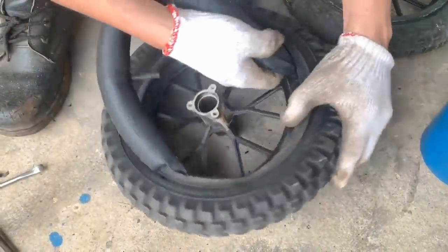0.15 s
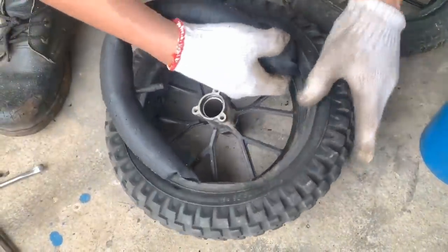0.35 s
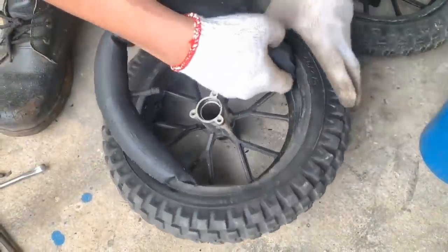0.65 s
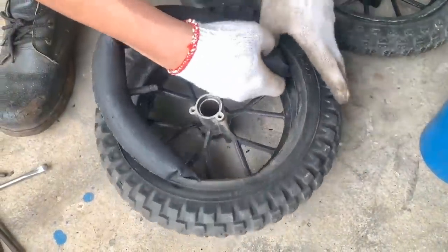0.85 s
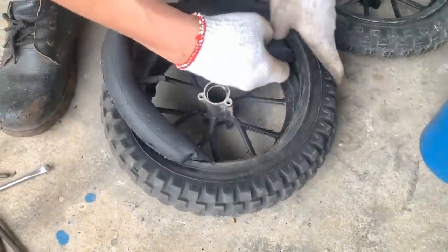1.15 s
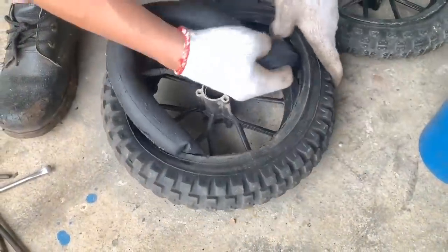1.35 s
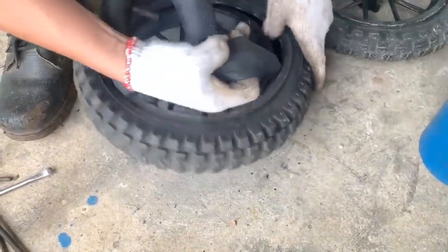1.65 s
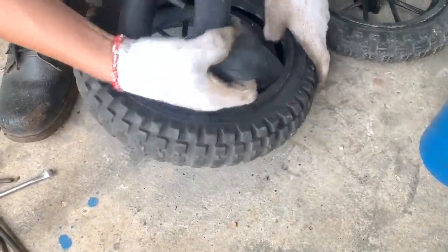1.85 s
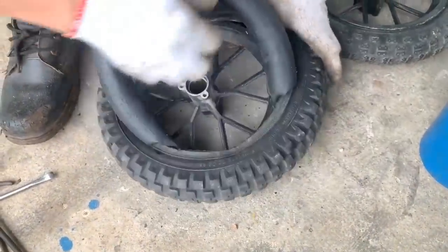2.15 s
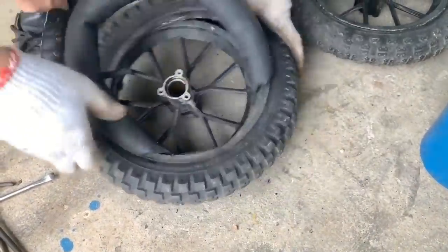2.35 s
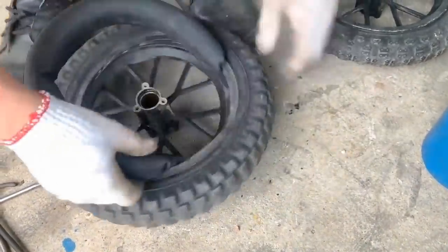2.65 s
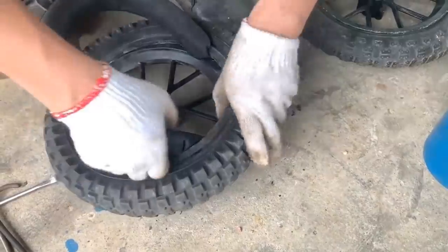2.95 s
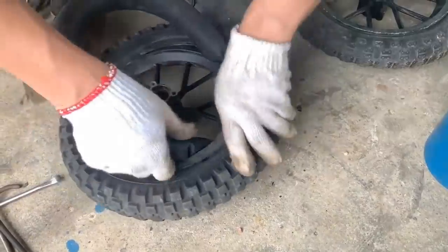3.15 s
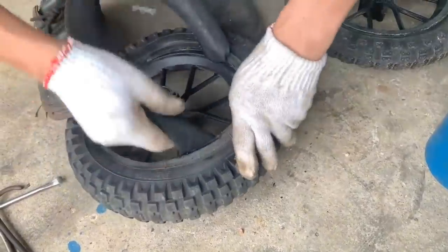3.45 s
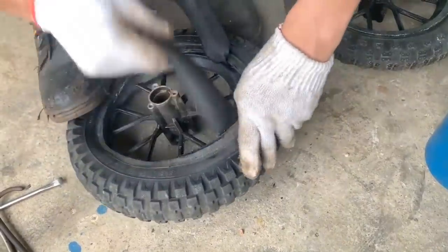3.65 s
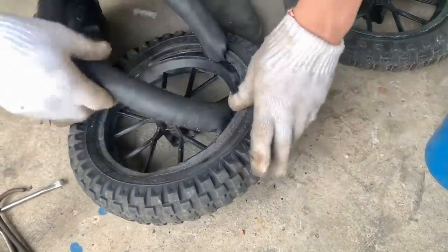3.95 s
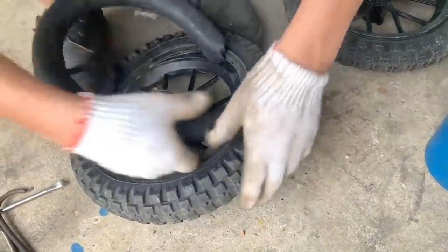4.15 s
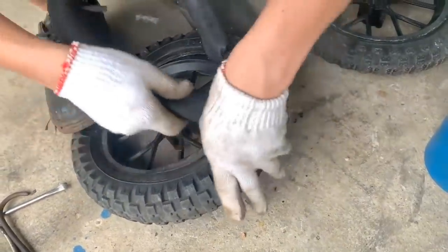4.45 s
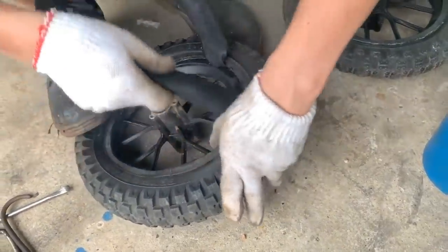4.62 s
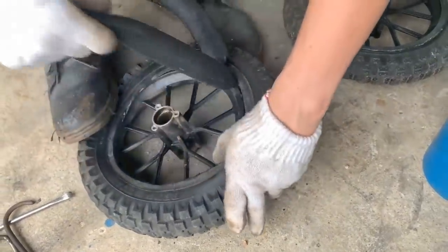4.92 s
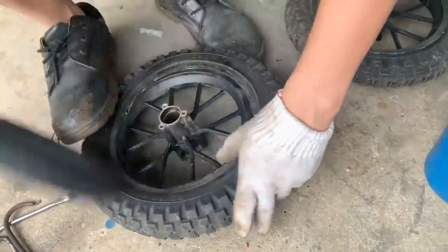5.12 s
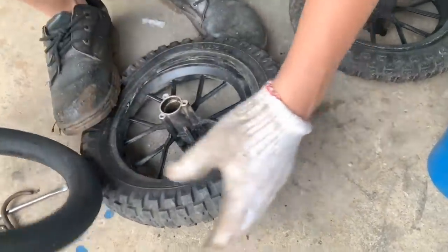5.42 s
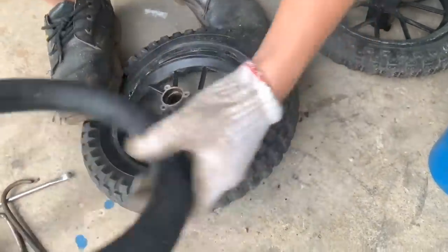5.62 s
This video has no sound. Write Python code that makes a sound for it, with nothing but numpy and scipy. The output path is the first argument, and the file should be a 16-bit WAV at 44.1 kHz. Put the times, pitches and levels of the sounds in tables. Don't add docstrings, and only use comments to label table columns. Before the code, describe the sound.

Close stereo pickup in an open workshop with faint low traffic. Gloved hands make a small tyre creak and rustle while its alloy wheel drags, ticks and bumps on concrete. Around two seconds it knocks hard and rings briefly, then again with a chirp. Rubber rubs and dull taps follow, until the inner tube pops out with a hollow thump and a small puff of air.

```python
import sys
import numpy as np
from scipy import signal
from scipy.fft import rfft, irfft, next_fast_len
from scipy.io import wavfile
from scipy.ndimage import uniform_filter1d

SR = 44100
rng = np.random.default_rng(int(sys.argv[2]) if len(sys.argv) > 2 else 0)


def output_pcm(signal):
    pcm = np.clip(np.atleast_2d(signal).T, -1, 1) * 32767
    wavfile.write(sys.argv[1], SR, np.round(pcm).astype(np.int16))


def nominal_scale(level):
    x = np.asarray(level, float) / 20
    return 10 ** x


N = 254898
SIZE = next_fast_len(N)


def evened(x):
    return x / np.sqrt(np.mean(x ** 2) + 1e-20)


def read(points, hz):
    f, value = np.transpose(points)
    return np.interp(np.log(hz + 1), np.log(f + 1), value)


def curve(rows):
    rows = np.asarray(rows)
    return np.interp(np.arange(N) / SR, rows[:, 0], rows[:, 1])


def add(mix, s, sound):
    part = mix[..., max(round(s * SR), 0):][..., :sound.shape[-1]]
    part += sound[..., :part.shape[-1]]


def colour(x, points):
    gain_db = np.maximum(read(points, abs(np.fft.fftfreq(4096, 1 / SR))), -100)
    taps = np.fft.ifft(np.exp(np.conj(signal.hilbert(np.log(nominal_scale(gain_db)))))).real[:2048]
    return signal.oaconvolve(np.atleast_2d(x), taps[None])[:, :x.shape[-1]]


def ring(hz, db, t60, length):
    t = np.arange(round(length * SR)) / SR
    return nominal_scale(db - 60 * t / t60) * np.sin(2 * np.pi * hz * t)


def grit(per_s, spread_db, clump_db, clump_s):
    size = nominal_scale(spread_db * np.minimum(rng.exponential(1, N), 4)) * rng.choice([-1, 1], N)
    clumps = evened(uniform_filter1d(rng.standard_normal(N), round(clump_s * SR)))
    clicks = rng.random(N) < per_s / SR
    return evened(size * clicks * nominal_scale(clump_db * clumps))


# f/Hz, likeness [0-1]
LIKENESS = [(60, 0.88), (230, 0.92), (910, 0.18), (3560, 0.18), (13900, 0.15)]


def pair(a, b):
    same = np.clip(read(LIKENESS, np.fft.rfftfreq(SIZE, 1 / SR)), 0, 1)
    second = irfft(same * rfft(a, SIZE) + np.sqrt(1 - same ** 2) * rfft(b, SIZE), SIZE)[:N]
    return np.array([a, second])


# f/Hz, level/dB per Hz
STREET = [(18, -40.5), (40, -20), (70, 2), (95, 4), (165, -5), (306, -15.5), (859, -29), (1960, -33.5),
          (6600, -46.5), (8320, -39.5), (9470, -51.5), (10800, -35.5), (12600, -48), (14300, -64)]
# t/s, level/dB
RUMBLE = [
    (0.0, -52),
    (2.8, -53.5),
    (3.05, -56),
    (3.8, -48),
    (4.0, -52.5),
    (5.78, -55.5),
]


def far():
    frames, hz = N // 256 + 5, np.fft.rfftfreq(1024, 1 / SR)
    a, b, c, d, patches = rng.standard_normal((frames, 513, 5)).T
    patches = uniform_filter1d(patches, size=10, axis=0)
    patches = evened(uniform_filter1d(patches, size=10, axis=1))
    z = np.array([a + 1j * b, c + 1j * d]) * nominal_scale(read(STREET, hz)[:, None] + 1.2 * patches)
    bed = evened(pair(*signal.istft(z, nperseg=1024, noverlap=768)[1][:, :N]))
    bed = signal.sosfilt(signal.butter(4, 48, "high", fs=SR, output="sos"), bed)
    low = signal.sosfilt(signal.butter(2, 200, fs=SR, output="sos"), bed)
    return nominal_scale(curve(RUMBLE) - 0.07) * low + nominal_scale(-55) * (bed - low)


# t/s (middle), half length/s, squeeze level/dB, glove slide level/dB
HEAVES = [(.14, 0.1, -49.5, -60.5), (0.443, 0.13, -50, -62.5), (0.691, 0.083, -47.5, -60.5),
          (0.96, 0.093, -55.5, -67), (1.29, 0.099, -60.5, -64), (1.51, 0.1, -54.5, -68.5),
          (1.736, .12, -77, -65.5), (2.08, 0.23, -57, -66.5), (2.388, 0.034, -54.5, -50.5),
          (2.447, 0.092, -54, -53.5), (2.566, 0.094, -54, -58.5), (3.024, .12, -59, -67),
          (3.168, 0.2, -55, -76), (3.54, 0.16, -56, -61.5), (3.669, 0.12, -48.5, -67),
          (3.816, 0.11, -59, -66), (4.253, 0.36, -63, -73), (4.629, 0.077, -51.5, -86),
          (4.817, 0.3, -58, -66), (4.969, 0.049, -65, -48), (5.127, .12, -58.5, -77),
          (5.453, 0.1, -70.5, -86.5)]
HEAVE_FALL_DB = -12
SQUEEZE = dict(order=2, rest_db=-73.5)
SLIDE = dict(order=3, rest_db=-81.5)


def hands(order, rest_db):
    t, rows = np.arange(0, N / SR + .01, .005), np.array(HEAVES)
    away = abs(t[:, None] - rows[:, 0]) / rows[:, 1]
    power = (nominal_scale(rows[:, order] + HEAVE_FALL_DB * away) ** 2).sum(1) + nominal_scale(rest_db) ** 2
    return curve(np.transpose([t, 10 * np.log10(power)]))


# f/Hz, level/dB
FLEX = [(120, -18), (220, 6), (380, 2.5), (600, -1), (1000, -11.5), (2000, -30)]
# f/Hz, level/dB
HISS = [(2000, -29.5), (3500, -3.5), (5500, -0.5), (6700, -8.5), (8400, -4), (10000, 3.5), (13000, -5.5)]


def tyre():
    flex = pair(grit(1200, 3, 3, .02), grit(1200, 3, 3, .02))
    hiss = pair(grit(9000, 3, 2.5, .02), grit(9000, 3, 2.5, .02))
    creak = nominal_scale(hands(**SQUEEZE) - 4) * evened(colour(flex, FLEX))
    return creak + nominal_scale(hands(**SLIDE) - 2.5) * evened(colour(hiss, HISS))


# f/Hz, level/dB struck at rim, level/dB struck at hub, level/dB
# dragged flat, level/dB dragged on edge, t60/s
WHEEL = [(405.3, -21, -25.5, -15, 5, 0.03), (520, -14, -24, -20, 0, .03), (600, -9, -19, -17, -11.5, 0.078),
         (748, -10, -36, -2.5, -29, 0.1), (1083, -26, -23, -17.5, -15.5, 0.069),
         (1210.4, -9, 0, -8, -17, 0.052), (1255, -7, -2.5, -8, 2.5, .05),
         (1620, -5.5, -21, -22.5, -21, 0.052), (1815, -3.5, -5.5, -17, -18, 0.28),
         (1917, -14, -1, -13, -2.5, 0.04), (2102, -16, -16, -25, -20, .05), (2502, -13, -26, -30, -35, .05),
         (2920, 5, -16, -10, -28.5, 0.05), (4440, -14, -21, -18, -29.5, 0.083),
          (4506, -7, -17.5, -22, -41, 0.066), (4823, -17, -12, -25.5, -17.5, 0.06),
          (4900, -23, -22, -31, -20, 0.09), (5450, -32, -12, -24, -36, 0.19),
          (6250, -26, -21, -32, -42.5, 0.078), (7520, -29.5, -28.5, -34, -42.5, 0.1),
          (7994, -29, -19, -25.5, -21, 0.12), (8500, -32.5, -27.5, -28, -37, 0.075),
          (10620, -15, -30, -27.5, -27, 0.05), (11698, -31.5, -22.5, -23, -34.5, 0.15),
          (12900, -25, -41, -37, -42.5, .05), (13400, -36, -23.5, -35, -42.5, 0.091),
         (3445, -24, -28, -35, -45, .08), (3806, -28, -30, -38, -45, .08), (4070, -26, -30, -35, -45, .08),
        (4371, -14, -22, -25, -35, .1), (5023, -12, -24, -32, -40, .045), (5755, -30, -18, -34, -45, .09),
        (6412, -32, -20, -34, -45, .09), (6900, -30, -28, -36, -45, .15), (7908, -24, -27, -32, -40, .11)]


def wheel(low, high, order, damping, length):
    t, modes = np.arange(round(length * SR)) / SR, 0
    for m in WHEEL:
        share = low if m[0] < 2500 else high
        db = m[order] + share * (m[order + 1] - m[order])
        modes = modes + ring(m[0], db, damping * m[-1], length)
    return modes * (1 - np.exp(-t / 0.00048))


# f/Hz, level/dB
RUB = [(500, -20), (1000, -3), (1700, -4), (2500, -8.5), (3500, -16.5), (5000, -35.5)]
SCRAPE_FROM_SQUEEZE, SCRAPE_DB = .6, -4.5
METAL_SHARE, STILL_S = .33, 3.3


def scrape():
    metal = wheel(.2, .2, order=3, damping=1, length=.2)
    metal = evened(signal.oaconvolve(grit(1300, 1.6, 2, .012), metal)[:N])
    rubber = evened(colour(pair(grit(4000, 3, 3, .02), grit(4000, 3, 3, .02)), RUB))
    share = METAL_SHARE * np.where(np.arange(N) < STILL_S * SR, 1, .1)
    level_db = SCRAPE_FROM_SQUEEZE * hands(**SQUEEZE) + (1 - SCRAPE_FROM_SQUEEZE) * hands(**SLIDE)
    return nominal_scale(level_db + SCRAPE_DB) * (np.sqrt(share) * metal + np.sqrt(1 - share) * rubber)


def patchy(x, depth_db):
    z = signal.stft(x, nperseg=512)[2]
    field = uniform_filter1d(rng.standard_normal(z.shape[1:]), size=7, axis=0)
    field = evened(uniform_filter1d(field, size=9, axis=1))
    return signal.istft(z * nominal_scale(depth_db * field), nperseg=512)[1][:, :N]


# start t/s, end t/s, start level/dB, end level/dB, tipped on edge [0-1]
DRAGS = [(0, .09, -64.5, -68, 0.4), (0.088, 0.178, -49.5, -46, 0), (.254, 0.323, -56.5, -62.5, 0.16),
         (0.404, 0.427, -55, -47, .7), (0.634, 0.723, -57, -55.5, 0.38), (.793, 0.903, -61.5, -74, 0.7),
         (0.921, 0.942, -50.5, -52.5, 0.9), (0.965, 1.022, -52, -49, 1), (1.028, 1.055, -53, -60, 1),
         (1.28, 1.284, -63, -61, 0.7), (1.345, 1.362, -41.5, -75, 1), (1.414, 1.503, -48, -49, 1),
         (1.496, 1.566, -72, -65.5, 0.4), (1.73, 1.804, -71.5, -68, 0.4), (1.997, 2.014, -52, -30, .1),
         (2.085, 2.167, -54, -58, 0.25), (2.155, 2.377, -62, -66, 0.25), (2.355, 2.386, -56, -35, .5),
         (2.382, 2.523, -44.5, -75, 0.6), (2.573, 2.662, -59, -53, 1), (2.982, 3.115, -64, -59.5, 0.5)]
EDGE_POWER = 1.8


def drags():
    out, slips = np.zeros(N), grit(2500, 2.5, 2.6, .007)
    for start, end, start_db, end_db, edge in DRAGS:
        stroke = slips[round(start * SR):round(end * SR)]
        stroke = stroke * nominal_scale(np.linspace(start_db, end_db, len(stroke)))
        stroke = stroke * signal.windows.tukey(len(stroke), .25)
        body = wheel(edge, edge ** EDGE_POWER, order=3, damping=.45, length=.15)
        add(out, start, signal.fftconvolve(stroke, body / np.linalg.norm(body)))
    return out


def tap(db, hz, treble_db, t60):
    hold_s, lean_db = .0045, -2.5
    t = np.arange(round(.06 * SR)) / SR
    swell = nominal_scale(-60 * np.maximum(t - hold_s, 0) / t60) * np.minimum(t / .002, 1)
    noise = rng.standard_normal((2, len(t))) * swell
    knock = signal.fftconvolve(noise[0], ring(hz, 0, 8.6 / hz, .033))[:len(t)]
    tick = colour(noise[1], HISS)[0]
    sound = knock / abs(knock).max() + nominal_scale(treble_db) * tick / abs(tick).max()
    return nominal_scale(db + np.array([[.5], [-.5]]) * lean_db) * sound


# t/s, peak level/dB, centre f/Hz, treble level/dB
TAPS = [(0.098, -52, 783, -2), (0.137, -46, 756, -15), (0.264, -53, 848, -10), (0.326, -57, 248, 1.5),
        (0.374, -54, 1300, -10), (0.635, -54, 1890, -10), (0.904, -47.5, 295, -7.5), (1.864, -60, 250, -23),
        (1.891, -52.5, 565, -31), (2.229, -54, 640, -3), (2.57, -51.5, 1800, 2), (2.763, -57, 307, 4),
        (3.089, -45, 432, -26), (3.151, -47, 477, -9.5), (3.23, -46.5, 473, -25), (3.26, -44, 520, -23),
        (3.335, -55, 930, -14), (3.471, -54, 1080, -15), (3.54, -52, 1010, -15), (3.815, -48, 720, -23),
        (5.144, -50, 374, -10), (5.674, -61, 387, -3.5)]


def taps():
    out = np.zeros((2, N))
    for s, *row in TAPS:
        add(out, s, tap(*row, t60=.032))
    return out


# t/s, metal level/dB, knock f/Hz, knock level/dB, ring stops after/s
BUMPS = [(0.4165, -46, 600, -48, .01), (0.442, -33, 850, -32, .009), (0.6414, -53, 1240, -55, .01),
         (0.6729, -46, 1300, -52, .01), (0.7277, -39, 1170, -38, .008), (0.9238, -45, 1320, -50, .012),
         (0.9632, -44, 380, -47, .01), (1.0321, -42, 400, -47, .01), (1.4165, -50, 600, -48, .008),
         (1.4391, -36, 1280, -42, .012), (1.459, -46, 520, -42, .008), (1.4897, -36, 520, -35, .004),
         (1.8642, -62, 735, -57, .006), (2.0112, -20, 1200, -18, .004), (2.0782, -20, 1500, -20, .003),
         (2.391, -30, 1250, -22, .005), (2.2295, -56, 700, -58, .008), (4.3015, -60, 870, -36, .003),
         (4.305, -70, 400, -39, .003)]
BUMP_CONTACT_S, KNOCK_CYCLES = .00035, 7


def bumps():
    out, t = np.zeros(N), np.arange(round(.06 * SR)) / SR
    metal = wheel(1, 1, order=1, damping=.6, length=.06)
    metal = signal.fftconvolve(metal, np.hanning(round(BUMP_CONTACT_S * SR)))[:len(t)]
    for s, metal_db, hz, knock_db, stop_s in BUMPS:
        stilled = nominal_scale(metal_db - 1500 * np.maximum(t - stop_s, 0)) * metal / abs(metal).max()
        add(out, s, stilled + ring(hz, knock_db, KNOCK_CYCLES / hz, .06))
    return out


# start t/s, loudest t/s, end t/s, level/dB, f/Hz
SING = [
    (.812, .83, .905, -61, 1815),
    (1.492, 1.515, 1.57, -62, 1812),
    (2.384, 2.39, 2.4, -21, 1830),
    (2.384, 2.389, 2.399, -29, 4823),
    (2.45, 2.46, 2.5, -52, 1808),
    (2.567, 2.63, 2.66, -49.5, 1808),
    (2.638, 2.662, 2.697, -38, 1808),
]
SING_RISE_DB, SING_STOP_DB = -5, -7


def sing():
    out = np.zeros(N)
    for start, top, end, db, hz in SING:
        t = np.arange(start, end, 1 / SR)
        swell = nominal_scale(db + np.interp(t, [start, top, end], [SING_RISE_DB, 0, SING_STOP_DB]))
        add(out, start, swell * np.sin(2 * np.pi * hz * t) * signal.windows.tukey(len(t), .35))
    return out


# t/s, peak level/dB, centre f/Hz, treble level/dB
RAPS = [
    (1.337, -49, 1360, -3.5),
    (2.986, -52, 760, -13),
    (3.655, -39, 1120, -10),
    (3.664, -36, 960, -10),
    (3.774, -44, 1300, -8),
]


def raps():
    out = np.zeros((2, N))
    for s, *row in RAPS:
        add(out, s, tap(*row, t60=.019))
    return out


# t/s, peak level/dB, hub share [0-1], hand stops the ring after/s, rattle level/dB
CLANGS = [
    (2.011, -15.5, .02, .066, 2.5),
    (2.0775, -22.5, .1, .009, 0),
    (2.103, -40, .5, .05, -20),
    (2.3845, -18, .98, .04, -5),
    (2.4303, -34, .98, .02, -15),
    (2.478, -48, .9, .01, 6),
]
BLOW_S = .011
FIRST_BLOW, FIRST_BLOW_S = .6, .0015


def clang(db, hub, stop_s, rattle_db):
    t = np.arange(round(.2 * SR)) / SR
    struck = wheel(hub, hub, order=1, damping=1, length=.2) * (1 - .8 * np.exp(-t / .005))
    chatter = rng.standard_normal(len(t)) * (1 + FIRST_BLOW * np.exp(-t / FIRST_BLOW_S))
    chatter = chatter * nominal_scale(-500 * t - 4600 * np.maximum(t - BLOW_S, 0))
    rattle = signal.fftconvolve(chatter, wheel(hub, hub, order=1, damping=.16, length=.055))[:len(t)]
    crack = colour(chatter, [(200, -5.5), (700, 2.5), (3000, -8), (6000, -2.5), (13000, -13)])[0]
    rattle = rattle / abs(rattle).max() + nominal_scale(-4) * crack / abs(crack).max()
    ringing = nominal_scale(-3000 * np.maximum(t - stop_s, 0)) * struck / abs(struck).max()
    return nominal_scale(db) * (ringing + nominal_scale(rattle_db) * rattle)


def clangs():
    out = np.zeros(N)
    for s, *row in CLANGS:
        add(out, s, clang(*row))
    return out


# loudest t/s, length/s, level/dB, centre f/Hz, treble level/dB
RUBS = [(2.998, 0.067, -53, 256, -39), (3.084, 0.068, -54, 450, -20.5), (3.281, 0.086, -55.5, 504, -14),
        (3.564, 0.09, -46.5, 1002, -7), (3.667, 0.067, -45, 900, -4.5), (3.778, 0.042, -53, 714, 1.5),
        (4.286, 0.05, -58, 1950, -8), (3.565, .06, -50, 400, -30), (3.59, .1, -54, 1700, -20),
        (3.5, .12, -56, 1050, -30), (3.62, .07, -55, 1050, -30), (4.626, 0.08, -56.5, 600, -7),
        (4.866, 0.076, -52.5, 400, -8), (4.992, 0.072, -43.5, 1580, -18), (5.148, 0.032, -54, 530, -2),
        (2.629, 0.06, -50.5, 400, -26), (5.695, 0.61, -75, 2990, -22), (4.083, 0.1, -70.5, 2000, 7)]
RUB_RISE = .44


def rubs():
    out = np.zeros((2, N))
    slips = pair(grit(5000, 2.5, 2.5, .008), grit(5000, 2.5, 2.5, .008))
    for top, length, db, hz, treble_db in RUBS:
        start, end = top - RUB_RISE * length, top + (1 - RUB_RISE) * length
        stroke = slips[:, round(start * SR):round(end * SR)]
        t = start + np.arange(stroke.shape[1]) / SR
        band = colour(stroke, [(hz / 4, -24), (hz / 1.1, -8), (hz, 0),
                               (hz * 1.04, -8), (hz * 4, -24), (hz * 12, -50)])
        skin = nominal_scale(treble_db) * evened(colour(stroke, HISS))
        swell = nominal_scale(db + np.interp(t, [start, top, end], [-16, 0, -18]))
        add(out, start, swell * (evened(band) + skin))
    return out


# f/Hz, level/dB, t60/s
CAVITY = [(232, -16, 0.08), (292, 0.5, 0.067), (400, -4, 0.025), (565, 0.5, 0.02), (790, -10.5, 0.024),
          (1400, -10, 0.022), (2000, -7.5, 0.019), (2330, -21, 0.077), (2930, -12.5, 0.075)]
THUMP_S, THUMP_DB = 4.9731, -13.5


def thump():
    push = np.zeros(round(.03 * SR))
    for s, size in [(0, -.12), (.0012, .15), (.0028, -1), (.0152, -.45), (.02, -.3)]:
        add(push, s, size * np.hanning(round(.00056 * SR)))
    hollow = sum(ring(hz, db, t60, .2) for hz, db, t60 in CAVITY)
    sound = signal.fftconvolve(push, hollow)
    t = np.arange(len(sound)) / SR
    sound = sound * nominal_scale(-np.clip(1500 * (t - .024), 0, 14))
    return nominal_scale(THUMP_DB) * sound / abs(sound).max()


PUFF_S, PUFF_DB, PUFF_T60 = 5.421, -56, .62


def puff():
    t = np.arange(round(.2 * SR)) / SR
    air = colour(rng.standard_normal((2, len(t))), [(3000, -16), (6000, -6.5), (9000, 3), (14500, 3.5)])
    fade = nominal_scale(PUFF_DB - 60 * t / PUFF_T60 - 466 * np.maximum(t - .08, 0))
    return fade * evened(air) * (1 + 1.2 * np.exp(-t / .002))


# f/Hz, t60/s
YARD = [(200, 0.24), (1000, .18), (4000, .14), (12000, 0.055)]


def yard(x):
    echoes = np.zeros((2, SR // 2))
    at = np.arange(120, SR // 2 - 20, 20) + rng.integers(0, 20, (2, (SR // 2 - 121) // 20))
    np.put_along_axis(echoes, at, rng.choice([-1., 1.], at.shape), 1)
    hz, t, z = signal.stft(echoes, SR, nperseg=256)
    tail = signal.istft(z * nominal_scale(-60 * t / read(YARD, hz)[:, None]), SR, nperseg=256)[1]
    return signal.fftconvolve(x[None], tail / np.linalg.norm(tail[0]), axes=1)[:, :N]


def lean(x, points, lead=((1, 0), (2, 0))):
    hz, side = np.fft.rfftfreq(SIZE, 1 / SR), np.array([[.5], [-.5]])
    tilt = nominal_scale(side * read(points, hz)) * np.exp(1j * side * read(lead, hz))
    return irfft(rfft(x, SIZE) * tilt, SIZE)[:, :N]


# f/Hz, level/dB
TONE = [(30, -25), (60, 0), (90, 2.5), (8000, 1.5), (8900, -1.5), (9300, -13), (10200, -16), (10500, 6),
        (11300, -0.5), (13200, -4), (14200, -21), (15000, -71.5)]
# f/Hz, level/dB
LEAN = [(60, 2.5), (150, -1), (370, -0.5), (910, -4), (2260, -1.0), (5600, 3), (13900, -16)]
# f/Hz, level/dB
WHEEL_LEAN = [(60, -1), (150, -4), (370, -1.5), (910, -0.5), (2260, -4.5), (5600, 1), (13900, -15.5)]
# f/Hz, phase [radians]
WHEEL_LEAD = [(1000, 0.86), (2200, 0.081), (4000, 1.53), (8000, 1.4), (13000, 0.24)]


def scene():
    knocks = clangs()
    hits = drags() + taps() + bumps() + raps() + rubs()
    add(hits, THUMP_S, thump())
    add(hits, PUFF_S, puff())
    echo = yard(hits.mean(0) + knocks)
    echo = nominal_scale(-16.5) * (echo + .5 * echo[::-1])
    near = hits + echo + sing() + patchy(scrape() + tyre(), 3.57)
    most = lean(colour(near, TONE) + far(), LEAN)
    return most + lean(colour(knocks, TONE), WHEEL_LEAN, WHEEL_LEAD)


def low_pass(x):
    return signal.sosfilt(signal.butter(12, 14460, fs=SR, output="sos"), x)


# f/Hz, level/dB a bin
AUDIBLE = [(3000, -120), (6500, -103), (9500, -99), (11500, -106), (13500, -99), (15000, -84.5)]


def record(dry):
    hz, _, z = signal.stft(dry, SR, nperseg=1024)
    power = abs(z[:, :512]) ** 2
    bands = power.reshape(2, 32, 16, -1).mean((0, 2))
    band_db = 10 * np.log10(np.repeat(bands, 16, axis=0) + 1e-20)
    z[:, :512] *= nominal_scale(-np.clip(2.2 * (read(AUDIBLE, hz[:512])[:, None] - band_db), 0, 35))
    mix = signal.istft(z, SR, nperseg=1024)[1][:, :N]
    return low_pass(mix)


dry = scene()
out = record(dry)
output_pcm(out)
```